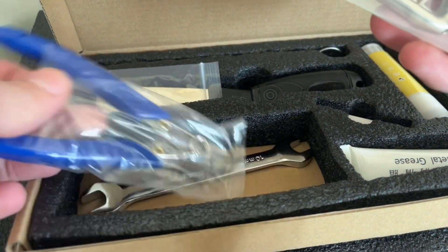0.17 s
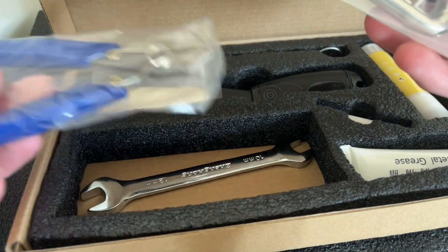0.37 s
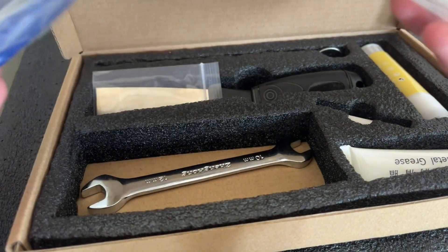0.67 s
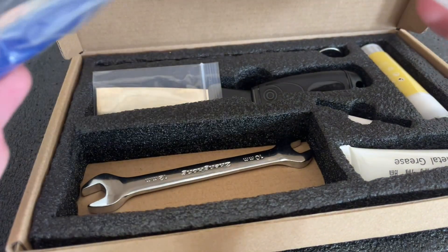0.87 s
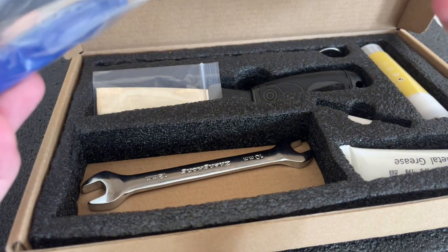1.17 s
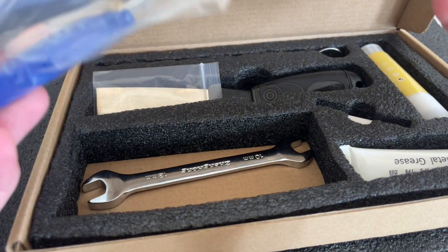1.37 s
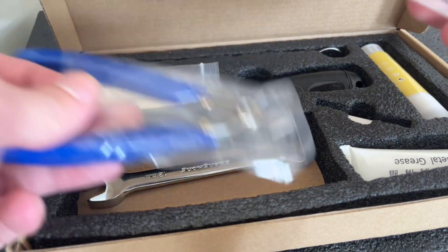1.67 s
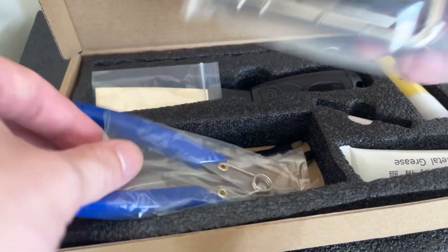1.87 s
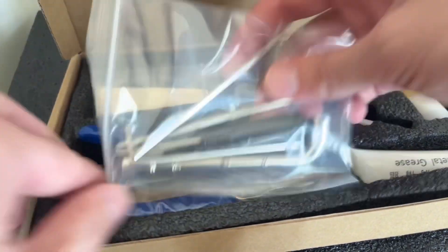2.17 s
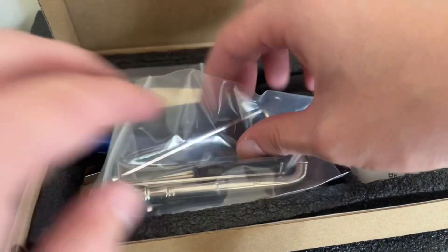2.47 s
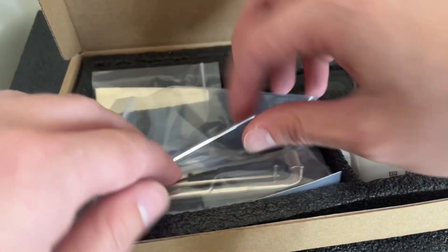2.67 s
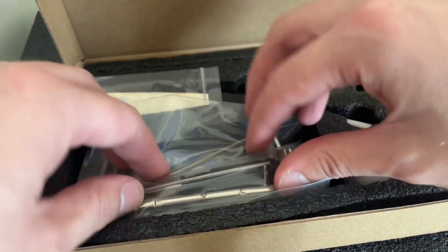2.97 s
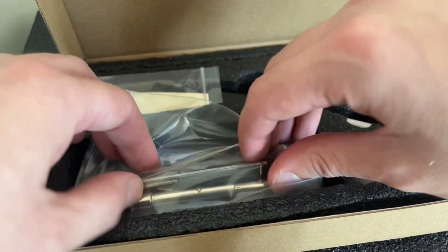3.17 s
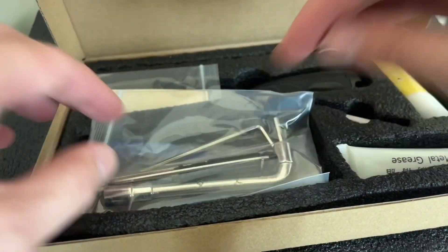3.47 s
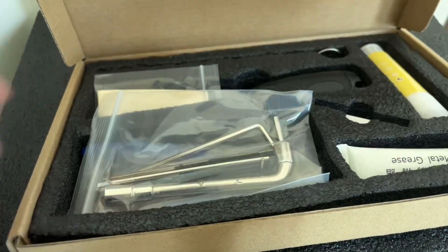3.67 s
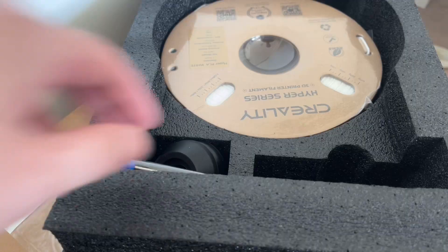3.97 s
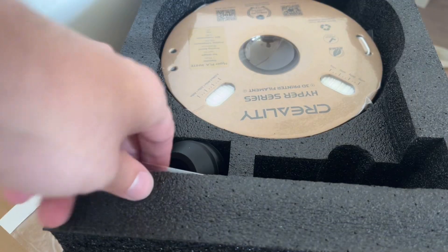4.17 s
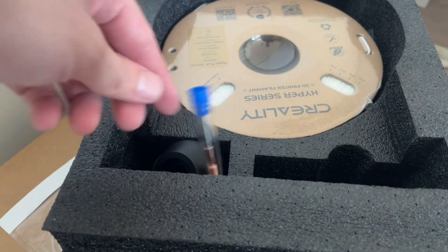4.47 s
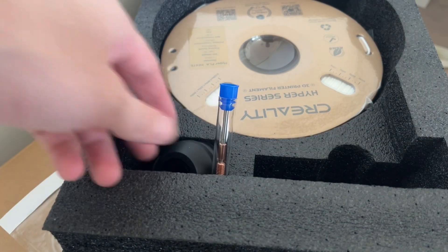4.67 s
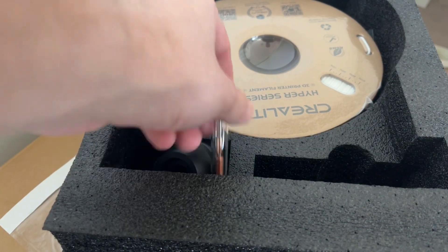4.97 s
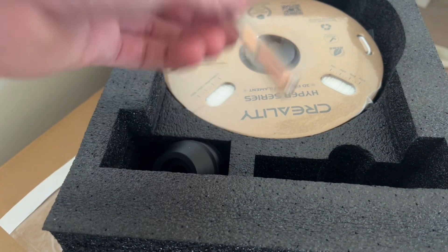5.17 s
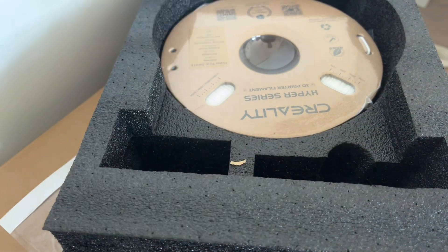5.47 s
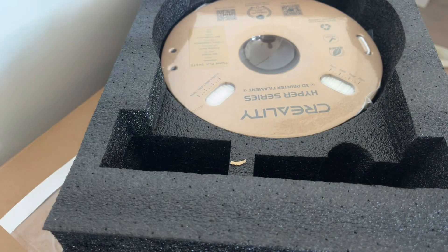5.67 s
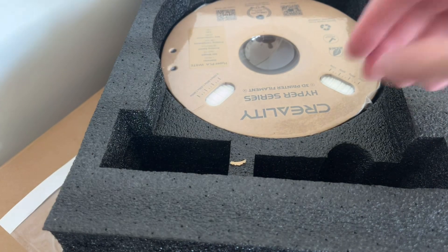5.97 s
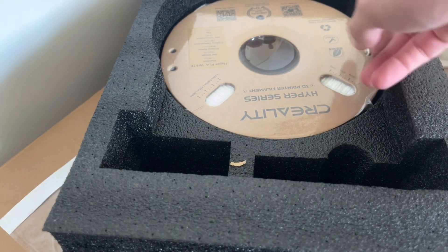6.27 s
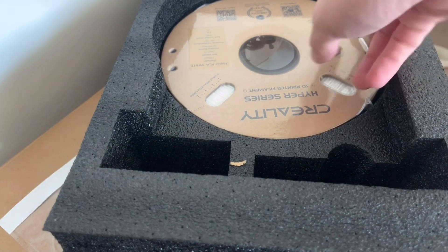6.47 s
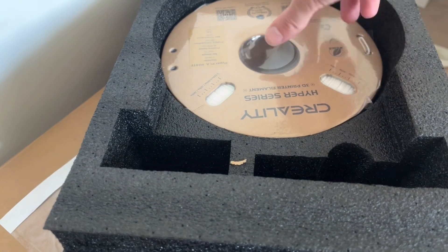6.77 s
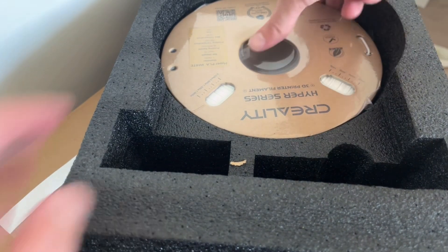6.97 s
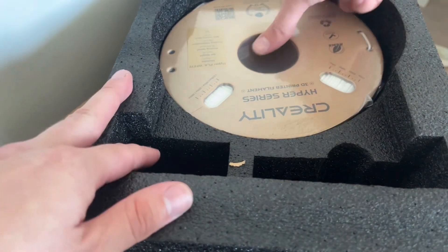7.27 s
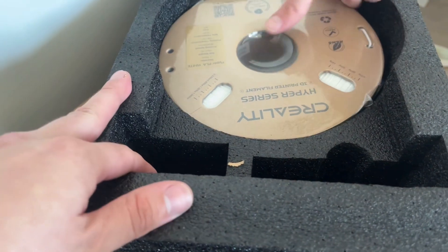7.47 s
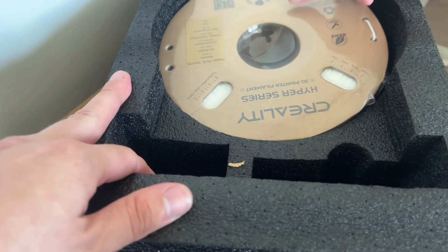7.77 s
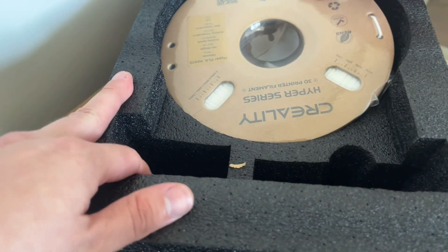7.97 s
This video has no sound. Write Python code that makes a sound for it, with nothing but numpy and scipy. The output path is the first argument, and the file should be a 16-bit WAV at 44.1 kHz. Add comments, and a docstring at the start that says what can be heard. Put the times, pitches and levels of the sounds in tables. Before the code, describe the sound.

Tools knock into a foam-lined cardboard box, a plastic bag crackles and clinks, then a wrapped spool thumps on foam while its film snaps.

```python
"""A small room with a low hum: a tool kit is unpacked at a table, heard close up in widened stereo.
Bagged pliers knock in a foam-lined cardboard box, and a plastic bag of hex keys is pressed in, clinking.
Then fingers brush the foam and rock a shrink-wrapped spool, which thumps while its film snaps.
Blows excite sums of decaying modes, buckling plastic gives filtered noise bursts, and sliding is
a train of tiny random slips; filtered noise and wavering sines make the room's steady sound."""
import sys
import numpy as np
from scipy import signal
from scipy.fft import rfft, irfft
from scipy.io import wavfile
from scipy.ndimage import uniform_filter1d

SR = 44100
rng = np.random.default_rng(int(sys.argv[2]) if len(sys.argv) > 2 else 0)


def master(y):
    """Save y as 16-bit WAV."""
    cut = np.clip(np.atleast_2d(y).T, -1, 1)
    pcm = np.round(cut * 32767)  # scale
    wavfile.write(sys.argv[1], SR, pcm.astype(np.int16))


N = 357651  # length in samples


def amp(db):
    """Level law: converts decibels to an amplitude gain."""
    return 10 ** (np.asarray(db) / 20)


def evened(x):
    """Power normalization: scales to rms 1."""
    return x / np.sqrt(np.mean(x ** 2) + 1e-20)


def peaked(x, db):
    """Peak normalization: scales to a peak level in dB."""
    return amp(db) * x / abs(x).max()


def read(points, hz):
    """Logarithmic pitch scale: interpolates a table along log frequency."""
    table_hz, value = np.transpose(points)
    return np.interp(np.log(hz + 1), np.log(table_hz), value)


def bins(size):
    """Discrete spectrum: the bin frequencies in Hz of a signal of that many samples."""
    return np.fft.rfftfreq(size, 1 / SR)


def add(mix, s, sound):
    """Superposition: adds a sound to the mix at time s in seconds."""
    part = mix[max(round(s * SR), 0):][:len(sound)]
    part += sound[:len(part)]


def colour(x, db):
    """Minimum phase: a causal filter follows from its gain per bin alone; x has an even length."""
    log_gain = np.log(amp(np.concatenate([db, db[-2:0:-1]])))
    response = np.exp(np.conj(signal.hilbert(log_gain)))
    return irfft(rfft(x) * response[:len(db)])


def shaped(x, points):
    """Zero-phase filtering: weights the spectrum of a full-length sound by a table in dB."""
    return irfft(rfft(x) * amp(read(points, bins(N))), N)


def slow_noise(count, limit_hz):
    """Band limitation: slow random drifts hold only frequencies below the limit."""
    return evened(irfft(rfft(rng.standard_normal((count, N))) * (bins(N) < limit_hz), N))


def burst(decay_s, ragged, size=2048):
    """Impulsive excitation: one sharp release, then a dying cluster of smaller ones."""
    x = rng.standard_normal(size) * np.exp(-np.arange(size) / SR / decay_s)
    x *= ragged / np.linalg.norm(x)
    x[0] += 1
    return x


# Likeness of diffuse sound in the left and right channels.
# Each row: frequency in Hz, correlation from 0 to 1.
LIKENESS = [(60, .98), (130, .98), (290, .9), (640, .5), (1400, 0), (16000, 0)]


def diffuse(pair):
    """Interchannel coherence: two unrelated signals become alike in the bass and stay unlike in the treble."""
    size = pair.shape[1]
    first, other = rfft(pair)
    same = np.clip(read(LIKENESS, bins(size)), -1, 1)
    second = same * first + np.sqrt(1 - same ** 2) * other
    return irfft(np.array([first, second]), size)


# Spectrum of the room noise. Each row: frequency in Hz, relative level in dB.
AIR_SPECTRUM = [(15, -41.5), (25, -14.5), (55, -2), (108, 0), (149, -11.5), (190, -3.5), (270, -12.5),
                (363, -11.5), (624, -26.5), (1370, -30), (1740, -26), (2610, -47), (4370, -52.5),
                (13200, -68.5), (16000, -88.5)]
# Room noise over time. Each row: time in seconds, rms level in dB.
AIR_LEVEL = [(0, -47.5), (3.66, -46.5), (3.7, -60), (4.85, -54.5), (5.0, -53.5), (5.33, -54.5),
             (5.36, -45.5), (8.11, -43.5)]
# Hum lines. Each row: frequency in Hz, rms level in dB while the room noise is at its loudest.
HUM_LINES = [(59.2, -61.5), (193.8, -57.5), (366.1, -66.5), (1669, -81), (5577, -99)]


def air(waver_rad):
    """Stationary noise and tones: shaped noise with hum lines whose phases drift at random."""
    t = np.arange(N) / SR
    level = amp(np.interp(t, *np.transpose(AIR_LEVEL)))
    noise = evened(shaped(diffuse(rng.standard_normal((2, N))), AIR_SPECTRUM))
    hum = np.zeros(N)
    for (hz, db), drift in zip(HUM_LINES, slow_noise(len(HUM_LINES), limit_hz=4)):
        hum += amp(db) * np.sqrt(2) * np.sin(2 * np.pi * hz * t + waver_rad * drift)
    return level * noise + hum * np.sqrt(level / level.max())  # the hum follows the level half as far in dB


# Decay of the room. Each row: frequency in Hz, time to fall by 60 dB in seconds.
ROOM_DECAY = [(120, .42), (400, 0.41), (1000, 0.31), (3000, 0.13), (8000, 0.029), (16000, 0.19)]


def room(x, first_s, treble_db):
    """Reverberation: dense reflections form a noise tail, each band decaying exponentially at its own rate."""
    hz, t, z = signal.stft(diffuse(rng.standard_normal((2, SR // 2))), SR, nperseg=256)
    tilt_db = read([(500, 0.0054), (4000, treble_db)], hz)[:, None]
    z *= amp(tilt_db - 60 * t / read(ROOM_DECAY, hz)[:, None])
    tail = signal.istft(z, SR, nperseg=256)[1]
    # silent until the first reflections, then rising over as long again
    tail *= np.clip(np.arange(tail.shape[1]) / SR / first_s - 1, 0, 1)
    return signal.fftconvolve(x[None], tail / np.linalg.norm(tail[0]), axes=1)[:, :N]


# Wavering side signal that widens the stereo image, of opposite sign in left and right.
# Each row: frequency in Hz, level relative to the direct sound in dB.
SIDE_LEVEL = [(60, -32), (250, -24), (600, -14), (1400, -7), (2300, -10), (4500, -5), (8000, -13),
              (9800, -7), (12000, -11), (14000, -7)]
# Level difference. Each row: frequency in Hz, left over right in dB.
LEFT_OVER_RIGHT = [(60, 0.5), (700, 3), (2000, 1.5), (3000, 4.5), (4500, 5), (6800, 1.5), (16000, 0)]
# Phase difference of the stereo widening.
# Each row: frequency in Hz, lead of the left channel in radians.
LEFT_PHASE_LEAD = [(600, 0), (1300, -.5), (2000, -.2), (3000, -.7), (4500, -.2), (7000, 1.7), (8300, 3.14),
                   (11500, 5.9), (13300, 6.7), (14600, 9.2)]


def widened(x, waver_hz):
    """Stereo widening: fixed level and phase differences by frequency, plus a randomly wavering difference."""
    hz = bins(N)
    waver = slow_noise(2, waver_hz)
    turned = (signal.hilbert(x) * (waver[0] + 1j * waver[1])).real / np.sqrt(2)
    side = shaped(turned, SIDE_LEVEL)
    lean = amp(read(LEFT_OVER_RIGHT, hz) / 2)
    left = rfft(x + side) * lean
    right = rfft(x - side) / lean * np.exp(-1j * read(LEFT_PHASE_LEAD, hz))
    return irfft(np.array([left, right]), N)


# Spectrum of a contact click. Each row: frequency in Hz, relative level in dB.
CLICK_SPECTRUM = [(100, -13), (1500, -5), (3500, -1.5), (5500, -15.5), (7700, -10.5), (11000, -14.5),
                  (16000, -19)]


def snaps(rows, sharpness, ragged, hiss_db):
    """Damped resonance: a sudden release rings one broad, quickly dying peak over a faint click."""
    out = np.zeros(N)
    for s, db, pitch_hz, decay_s in rows:
        x = burst(decay_s, ragged)
        hz = bins(len(x)) + 1
        detuning = sharpness * (hz / pitch_hz - pitch_hz / hz)
        peak_power = 1 / (1 + detuning ** 2) ** 2
        hiss_power = amp(hiss_db + read(CLICK_SPECTRUM, hz)) ** 2
        add(out, s, peaked(colour(x, 10 * np.log10(peak_power + hiss_power)), db))
    return out


def knocks(blows, modes, focus_db, swell_cycles, click_s, size=16384):
    """Modal synthesis: a blow rings modes near its pitch; low ones swell last, as bending waves are slower."""
    out, t = np.zeros(N), np.arange(size) / SR
    hz, mode_db, t60 = np.transpose(modes)[:, :, None]
    swing = np.sin(2 * np.pi * hz * t) * (1 - np.exp(-(t * hz / swell_cycles) ** 2))
    swing = signal.lfilter(*signal.butter(2, 85, "high", fs=SR), swing)  # small bodies radiate little deep bass
    for s, db, favoured_hz, ring, click_db in blows:
        octaves_off = np.log2(hz / favoured_hz)
        off_db = focus_db * (np.sqrt(1 + (2 * octaves_off) ** 2) - 1)
        ringing = (amp(mode_db - off_db - 60 * t / (t60 * ring)) * swing).sum(0)
        add(out, s, peaked(ringing, db + 4))
        contact = burst(click_s, ragged=2.3)
        click = colour(contact, read(CLICK_SPECTRUM, bins(len(contact))))
        add(out, s, peaked(click, click_db))
    return out


def settling(blows, after_s, weight_hz, weight_db, soft_db, damped):
    """Compliant support: the foam takes the weight with a low, soft thump after each blow."""
    thumps = [(s + after_s, db + weight_db, min(hz, weight_hz), ring * damped, click_db + soft_db)
              for s, db, hz, ring, click_db in blows]
    return blows + thumps


# Fall in level, in dB, from the hardest push of a stroke to the ends of its build-up and die-away
STROKE_DROP_DB = 20
STROKE_ROUNDNESS = 1.34  # 1 = a pointed swell, 2 = a bell


def effort(strokes):
    """Power addition: strokes swell to their hardest push and die away; returns scrape and fizz gains."""
    t, power = np.arange(0, N, 32) / SR, 0
    for s, build_s, die_s, scrape_db, fizz_db in strokes:
        away = np.maximum((s - t) / build_s, (t - s) / die_s)
        level_db = np.array([[scrape_db], [fizz_db]]) - STROKE_DROP_DB * away ** STROKE_ROUNDNESS
        power = power + amp(level_db) ** 2
    return [np.interp(np.arange(N) / SR, t, np.sqrt(p)) for p in power]


def patchy(x, depth_db):
    """Local resonance: patches of the surface sound in turn as the contact moves."""
    z = signal.stft(x, nperseg=256)[2].T  # time by frequency
    patches = uniform_filter1d(rng.standard_normal(z.shape), size=7, axis=0)
    patches = uniform_filter1d(patches, size=4, axis=1)
    return signal.istft((z * amp(depth_db * evened(patches))).T, nperseg=256)[1][:N]


# Spectrum of the lower rubbing sound. Each row: frequency in Hz, relative level in dB.
SCRAPE_SPECTRUM = [(100, -18), (300, -4), (700, 0), (1500, 0), (3000, -3), (4500, -9), (7000, -17),
                   (16000, -45)]
# Spectrum of the treble rubbing sound. Each row: frequency in Hz, relative level in dB.
FIZZ_SPECTRUM = [(500, -40), (3500, -11), (6000, -2), (7400, 1), (8700, -5), (10200, 0), (12000, 0),
                 (13700, -4), (15000, -15), (16000, -20)]


def rubbing(strokes, slips_per_s, spread_db, smooth, patchy_db, scrape_db, fizz_db):
    """Stick-slip friction: countless tiny slips of uneven size, over a smooth hiss, under each stroke."""
    sizes = amp(spread_db * np.minimum(rng.exponential(1, N), 3)) * rng.choice([-1, 1], N)
    slips = evened(sizes * (rng.random(N) < slips_per_s / SR))
    drive = patchy(slips + smooth * rng.standard_normal(N), patchy_db)
    scrape, fizz = evened(shaped(drive, SCRAPE_SPECTRUM)), evened(shaped(drive, FIZZ_SPECTRUM))
    scrape_gain, fizz_gain = effort(strokes)
    return scrape * scrape_gain * amp(scrape_db) + fizz * fizz_gain * amp(fizz_db)


# Small things touching and scuffing.
# Each row: start in seconds, peak level in dB, pitch in Hz, decay time constant in seconds.
TICK_ROWS = [(.388, -51, 3930, 0.015), (1.908, -33, 1320, 0.015), (2.284, -23.5, 1400, 0.018),
             (2.968, -29.5, 1680, .011), (3.537, -41, 1750, 0.0044), (3.735, -55.5, 1257, 0.0087),
             (4.205, -44, 1070, 0.024), (4.318, -49, 6000, 0.0051), (4.3957, -37.5, 5530, 0.0011),
             (4.995, -37, 1450, .004), (5.349, -55.5, 2400, .001), (7.102, -33.5, 732, 0.017),
             (7.165, -36.5, 750, 0.045)]


def ticks():
    """Light impact: small things touching and scuffing ring a short resonance."""
    return snaps(TICK_ROWS, sharpness=1.7, ragged=3, hiss_db=-21)


# Fingers and a small tube sliding on the foam. Each row: time of the hardest push, build-up and
# die-away in seconds, relative levels of scrape and fizz in dB.
FOAM_PUSHES = [(4.04, 0.047, 0.13, -66, -69.5), (4.235, 0.096, 0.033, -51, -46),
               (4.3, 0.093, 0.26, -68.5, -74), (4.397, 0.0037, 0.037, -51, -84),
               (4.592, 0.028, 0.044, -62, -64), (4.71, 0.088, 0.063, -69, -70.5),
               (4.985, 0.079, 0.031, -55.5, -67)]


def foam():
    """Dry friction: dense slips on the foam give a soft brushing noise."""
    return rubbing(FOAM_PUSHES, slips_per_s=1500, spread_db=3.0, smooth=1.0,
                   patchy_db=5.5, scrape_db=0.0, fizz_db=-6.5)


# Steel tools touching. Each row: start in seconds, relative level in dB, favoured pitch in Hz,
# ring as a factor on the decay time, peak level of the contact click in dB.
STEEL_TOUCHES = [(.045, -37.5, 2826, 0.94, -47), (2.039, -24, 11000, 0.64, -26.5),
                 (2.145, -36, 12000, 0.44, -40), (2.332, -39.5, 12000, 0.69, -27.5),
                 (2.508, -43.5, 11000, 0.65, -50), (2.671, -32, 12000, 0.78, -33),
                 (2.722, -31.5, 9050, 0.64, -29)]
# Modes of pliers and hex keys. Each row: frequency in Hz, relative level in dB,
# 60 dB decay time in seconds before the ring factor.
STEEL_MODES = [(2890, -6, .3), (7120, 8.5, 0.028), (11800, 2, 0.05), (11900, -6, 0.1),
               (12050, -10.5, 0.069)]


def steel():
    """Metallic modes: pliers and hex keys clink at high natural frequencies."""
    return knocks(STEEL_TOUCHES, STEEL_MODES, focus_db=8.5, swell_cycles=0.93, click_s=0.0017)


# Tools knocking in the box. Each row: start in seconds, relative level in dB, favoured pitch in Hz,
# ring as a factor on the decay time, peak level of the contact click in dB.
BOX_KNOCKS = [(.0428, -15, 900, 0.81, -19.5), (.0462, -12.5, 278, 0.76, -45),
              (1.7212, -10, 1382, 0.86, -17), (1.7278, -9.5, 600, .8, -16), (1.736, -9.5, 110, 0.62, -45),
              (1.918, -31.5, 502, 0.98, -37), (2.017, -30.5, 455, 1, -39.5), (2.335, -36, 305, 1, -36),
              (2.508, -37.5, 250, .62, -40.5), (2.616, -30.5, 397, 0.9, -45.5), (2.722, -37.5, 350, 1, -52),
              (4.412, -31.5, 107, 0.81, -71)]
# Modes of the box with its foam tray. Each row: frequency in Hz, relative level in dB,
# 60 dB decay time in seconds before the ring factor.
BOX_MODES = [(120, 2, 0.18), (191, 0.5, 0.041), (230, 2, 0.064), (282.4, 6, 0.052), (344, 8.5, .035),
             (509, 6.5, 0.038), (589, -7, 0.069), (716, -4, 0.067), (822, -10, 0.11), (937, -0.5, 0.067),
             (1107, -9.5, 0.0034), (1306, -12.5, 0.065), (1560, -3, 0.018), (1585, -8.5, 0.052),
             (1710, -9, 0.047), (2410, -3, .025), (3410, -7.5, .025)]


def box():
    """Panel vibration: tools strike the damped modes of the cardboard box, then sink into its foam."""
    blows = settling(BOX_KNOCKS, after_s=.0034, weight_hz=186, weight_db=-3, soft_db=-13, damped=0.75)
    return knocks(blows, BOX_MODES, focus_db=9, swell_cycles=0.96, click_s=0.0063)


# The spool bumping in its pocket. Each row: start in seconds, relative level in dB, favoured pitch in Hz,
# ring as a factor on the decay time, peak level of the contact click in dB.
SPOOL_BUMPS = [(5.636, -32.5, 220, 0.58, -40), (5.8155, -9.5, 291, 0.6, -26), (5.887, -12.5, 279, .69, -32),
               (5.9105, -16.5, 367, 1.36, -35.5), (6.024, -26.5, 161, 1.4, -74),
               (6.0595, -18, 248, .67, -34.5), (6.379, -30, 169, 2.3, -45),
               (6.624, -18.5, 167, 0.45, -50.5), (6.733, -19.5, 245, 0.66, -47),
               (6.838, -16.5, 262, .82, -29.5), (6.9315, -6, 244, 0.92, -29.5), (6.974, -13, 217, 1.2, -36),
               (7.1, -31.5, 162, 2.3, -26), (7.392, -23, 364, 0.51, -23), (7.408, -23, 130, 0.45, -60)]
# Modes of the spool on the foam. Each row: frequency in Hz, relative level in dB,
# 60 dB decay time in seconds before the ring factor.
SPOOL_MODES = [(124.5, -14.5, 0.11), (152.8, -8, 0.14), (193, 3, 0.071), (230.6, 0, 0.044),
               (278.8, -6.5, 0.044), (384.5, -4.5, 0.0498), (513, -3.5, 0.035), (696, -8.5, 0.04),
               (784, 1, 0.024), (1240, -13, 0.13), (1700, -29, 0.022), (1820, 1.5, 0.059),
               (2960, -29, 0.035)]


def spool():
    """Mass on a soft support: the rocking spool rings its modes and thumps down on the foam."""
    blows = settling(SPOOL_BUMPS, after_s=.0085, weight_hz=124, weight_db=-7.5, soft_db=-28, damped=0.62)
    return knocks(blows, SPOOL_MODES, focus_db=9.0, swell_cycles=1.17, click_s=0.0025)


# Fingers sliding on the wrapped spool. Each row: time of the hardest push, build-up and
# die-away in seconds, relative levels of scrape and fizz in dB.
FILM_PUSHES = [(5.642, 0.0071, .19, -53.5, -54.5), (5.93, 0.1, 0.054, -47, -64),
               (6.06, 0.13, 0.096, -56.5, -60.5), (6.21, 0.061, 0.082, -52.5, -60.5),
               (6.35, 0.16, 0.16, -48.5, -65.5), (6.505, 0.034, .02, -44, -50.5),
               (6.722, 0.0043, 0.036, -49, -55.5), (6.81, 0.07, 0.13, -52.5, -65),
               (6.97, 0.087, 0.044, -44, -59), (7.16, 0.24, 0.2, -47, -52), (7.37, 0.094, 0.079, -39, -81),
               (7.645, 0.027, 0.082, -42, -52.5), (7.9, 1, 1, -57.5, -62)]
# The taut film snapping.
# Each row: start in seconds, peak level in dB, pitch in Hz, decay time constant in seconds.
FILM_SNAPS = [(6.1837, -39, 2090, 0.0055), (6.7893, -31.5, 1660, .0023), (6.9298, -23.5, 3080, .0018),
              (6.972, -23.5, 1790, 0.0022), (7.2572, -31.5, 1150, .002), (7.2842, -41, 4700, .001),
              (7.3186, -6, 1806, 0.0053), (7.3279, -20.5, 2250, 0.0011), (7.3658, -9, 1710, 0.0014),
              (7.6338, -10.5, 2270, 0.0022)]


def film():
    """Friction and tension release: fingers rub the taut film of the spool, which snaps."""
    rub = rubbing(FILM_PUSHES, slips_per_s=1800, spread_db=-1, smooth=1.0,
                  patchy_db=4.0, scrape_db=-3.5, fizz_db=-1.5)
    return rub + snaps(FILM_SNAPS, sharpness=1.45, ragged=.7, hiss_db=-29)


# Spectrum of a buckling crease. Each row: frequency in Hz, relative level in dB.
CREASE_SPECTRUM = [(60, -17.5), (300, -5.5), (1000, -3.5), (2300, -6.5), (4000, -9), (5500, -10),
                   (7500, -1.5), (11500, -1), (16000, -15.5)]


def pop(decay_s, ragged, body_db, top_db):
    """Buckling: thin plastic jumps between shapes, with more or less low body and top sizzle."""
    x = burst(decay_s, ragged)
    hz = bins(len(x))
    balance_db = read([(900, body_db), (2000, 0), (4500, 0.0031), (9000, top_db)], hz)
    return colour(x, read(CREASE_SPECTRUM, hz) + balance_db)


# The clearest creases of the bags popping.
# Each row: start in seconds, relative level in dB, relative level of the top sizzle in dB.
CREASE_POPS = [(0.1521, -21, -11), (0.184, -32, -13), (0.232, -41.5, -19), (0.2757, -39.5, -21),
               (0.335, -42, -23), (0.5062, -41.5, -40), (0.773, -47, -26), (1.659, -25.5, -14),
               (1.934, -23, -20.5), (2.098, -21.5, -24), (2.1056, -15, -28.5), (2.1256, -19, -26.5),
               (2.1441, -13.5, -4.5), (2.1654, -16, -16), (2.192, -13, -10), (2.2343, -23, -10.5),
               (2.2497, -22, -24.5), (2.3185, -17, -26.5), (2.3308, -10.5, -16.5), (2.4223, -22.5, -25.5),
               (2.4749, -22, -29), (2.507, -8.5, -16), (2.5675, -20, -26), (2.67, -16, -22.5),
               (2.7214, -16, -17), (2.824, -22.5, -14), (2.8492, -21.5, -23), (2.8798, -28, -28),
               (2.9197, -16, -31.5), (2.9872, -21, -23), (3.052, -17.5, -16), (3.0818, -21, -27),
               (3.1998, -18.5, -9), (3.213, -17, -14.5), (3.3229, -21.5, -28), (3.666, -37.5, -18)]


def creases(level_db, decay_s, ragged, body_db, sizzle_db, scatter_s, lesser_db, count=4):
    """Buckling cascade: a crease gives one main pop, with lesser ones just before and after it."""
    out = np.zeros(N)
    for s, db, top_db in CREASE_POPS:
        for k in range(count):
            late_s, drop_db = 0, 0  # the main pop
            if k:
                late_s = scatter_s * rng.standard_normal()
                drop_db = lesser_db - 3 * rng.exponential()
            sound = pop(decay_s, ragged, body_db, top_db + sizzle_db)
            add(out, s + late_s + .001, peaked(sound, db + level_db + drop_db))
    return out


def crinkle(strokes, pops_per_s, above_db, spread_db, decay_s, ragged, body_db, top_db, vary_db, count=12):
    """Poisson process: small creases give way at random, as loud as the bag is being pushed."""
    sizes = effort(strokes)[0] * amp(above_db - spread_db * rng.random(N))
    sizes *= rng.random(N) < pops_per_s / SR
    which, out = rng.integers(0, count, N), np.zeros(N)
    # a stock of differently coloured pops
    pops = [peaked(pop(decay_s, ragged, body_db + low, top_db + high), 0)
            for low, high in vary_db * rng.standard_normal((count, 2))]
    for at in np.flatnonzero(sizes):
        add(out, at / SR, sizes[at] * pops[which[at]])
    return out


# Hands pushing the bags. Each row: time of the hardest push, build-up and die-away in seconds,
# relative levels of scrape and fizz in dB.
BAG_PUSHES = [(.045, .08, 0.14, -43.5, -48.5), (1.69, .06, 0.36, -49, -52.5), (1.91, .16, .045, -46, -49.5),
              (2.11, .12, 0.28, -42, -56), (2.29, .12, 0.17, -47.5, -50), (2.53, .17, 0.32, -48, -59.5),
              (2.71, .1, 0.14, -45.5, -53.5), (2.96, .23, 0.22, -47.5, -56.5),
              (3.26, .14, 0.1, -44.5, -51.5), (3.38, .1, 0.25, -66.5, -74), (3.665, 0.35, .015, -70.5, -79)]


def bags():
    """Crumpling of thin sheets: clear creases, a random crinkle and rubbing as hands push the bags."""
    out = creases(level_db=0.5, decay_s=0.0028, ragged=2, body_db=-2.5, sizzle_db=3.5,
                  scatter_s=0.015, lesser_db=-16.0)
    out += crinkle(BAG_PUSHES, pops_per_s=80, above_db=26.5, spread_db=13, decay_s=0.00058,
                   ragged=1.1, body_db=2, top_db=-14, vary_db=6)
    out += rubbing(BAG_PUSHES, slips_per_s=800, spread_db=-2.5, smooth=.35,
                   patchy_db=5, scrape_db=0.5, fizz_db=0.5)
    return out


def scene():
    """Superposition: widened handling sounds, their reverberation and the steady room noise add."""
    near = ticks() + foam() + steel() + box() + spool() + film() + bags()
    direct = widened(near, waver_hz=60.46)
    reverberant = amp(-16.0) * room(near, first_s=0.01, treble_db=3.0)
    return direct + reverberant + air(waver_rad=0.2)


def record(dry):
    """Band limitation: a linear-phase low-pass filter removes sound above its edge."""
    edge_hz = 16000
    low_pass = signal.firwin(511, edge_hz, window=("kaiser", 9), fs=SR)
    return signal.oaconvolve(dry, low_pass[None], "same")


dry = scene()
out = record(dry)
master(out)
```